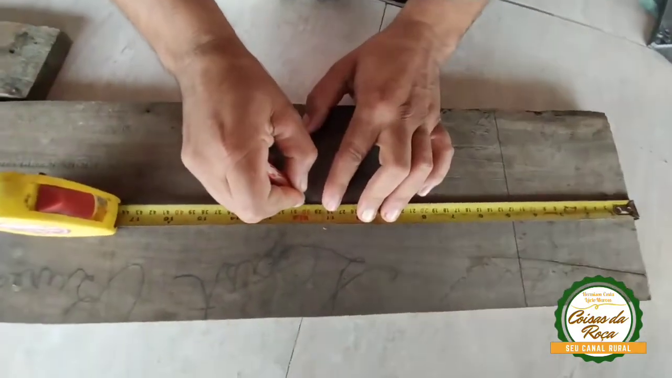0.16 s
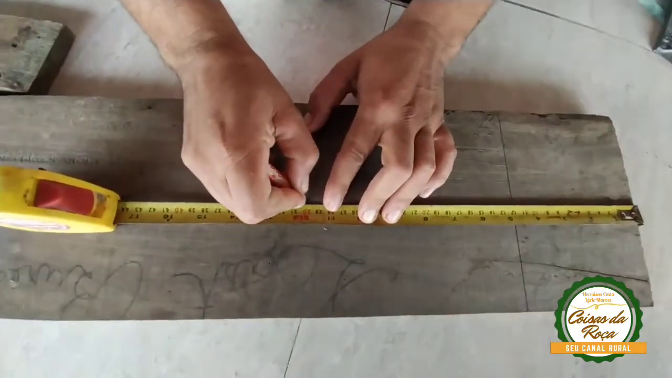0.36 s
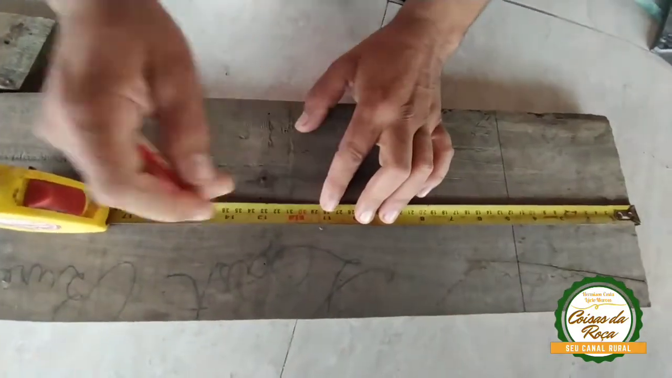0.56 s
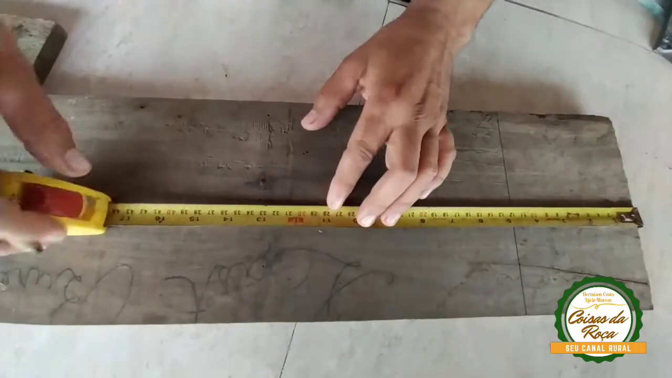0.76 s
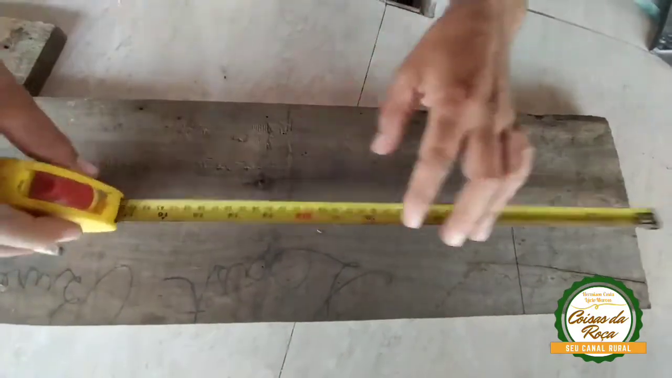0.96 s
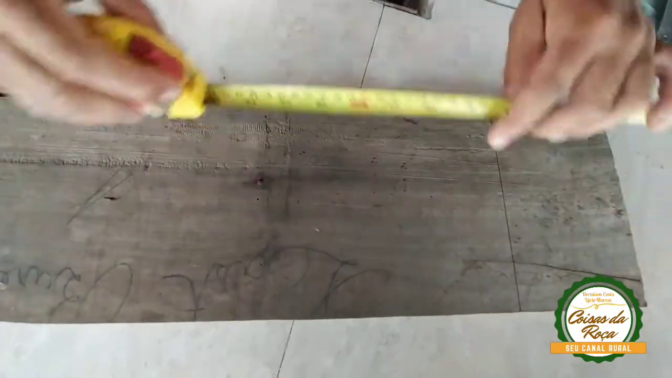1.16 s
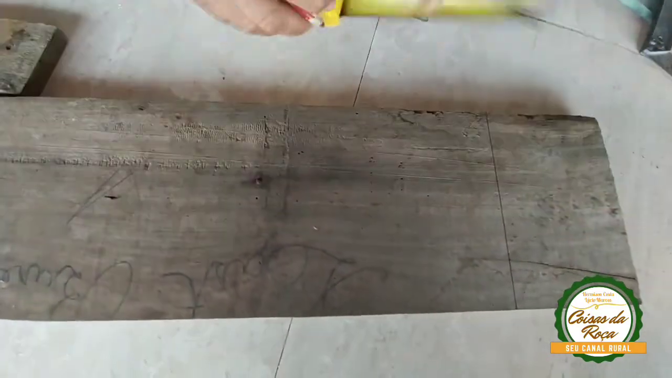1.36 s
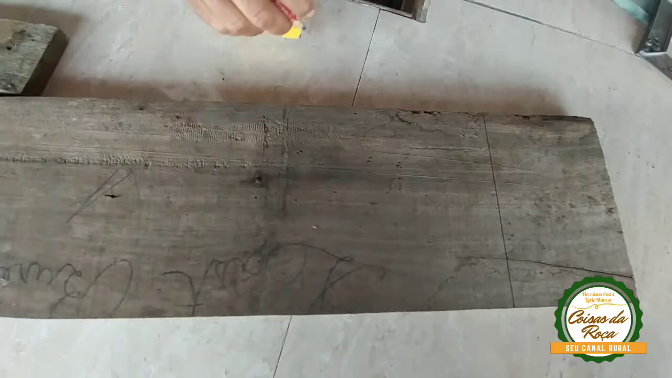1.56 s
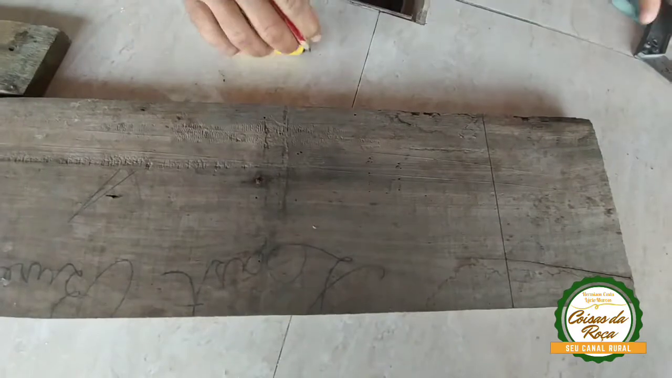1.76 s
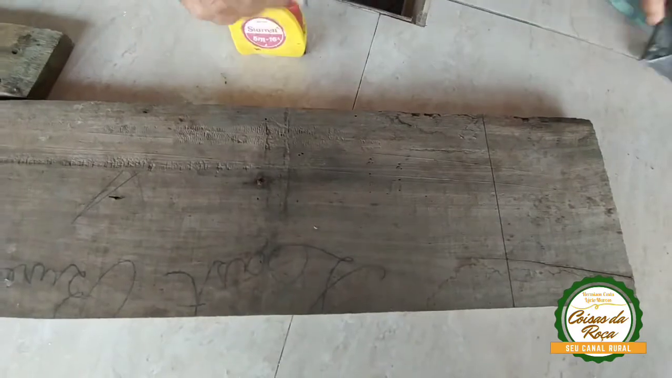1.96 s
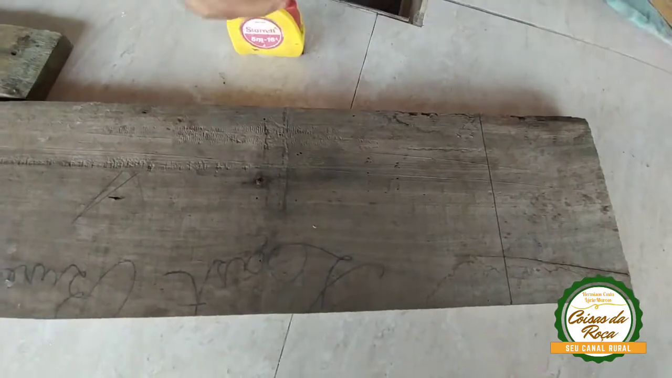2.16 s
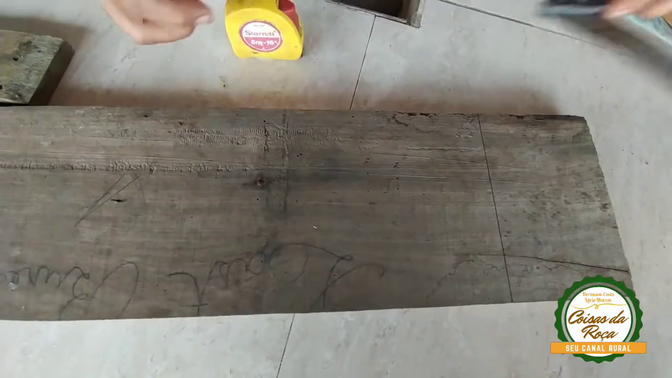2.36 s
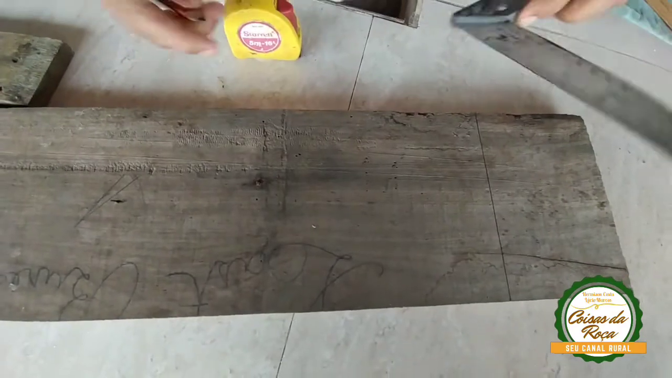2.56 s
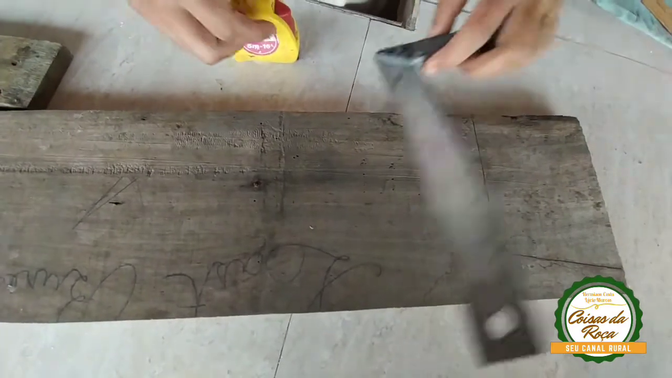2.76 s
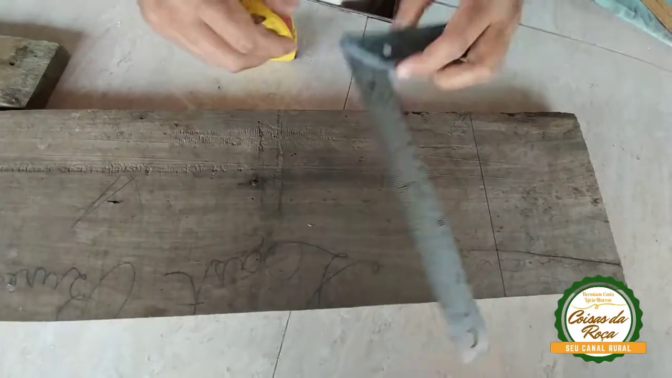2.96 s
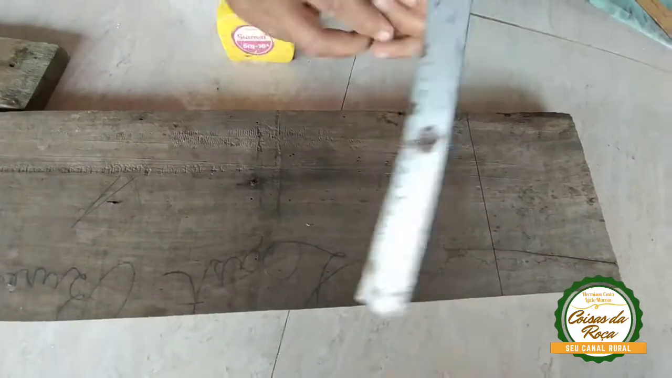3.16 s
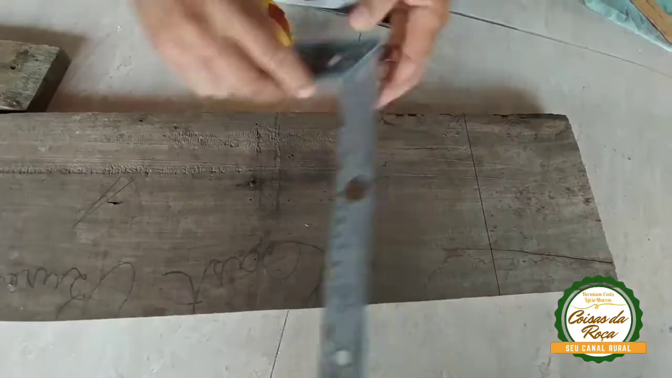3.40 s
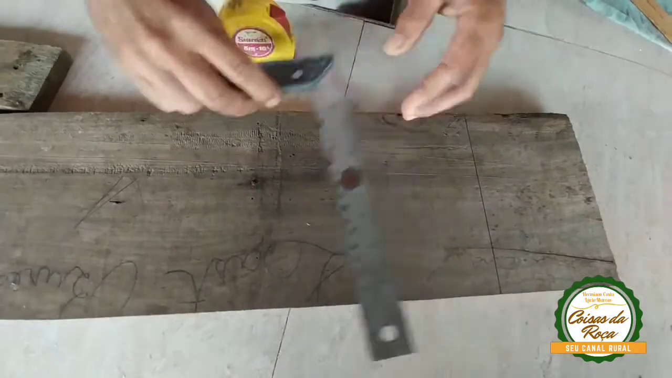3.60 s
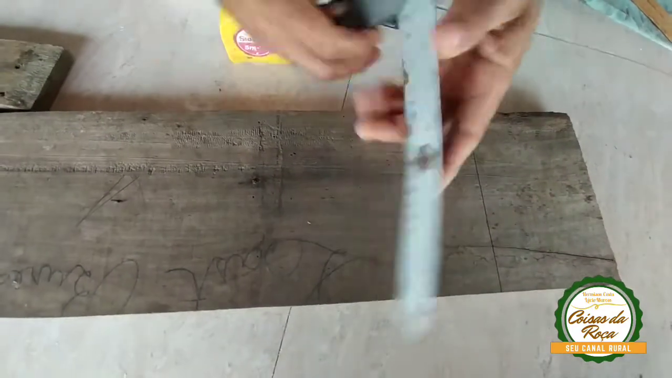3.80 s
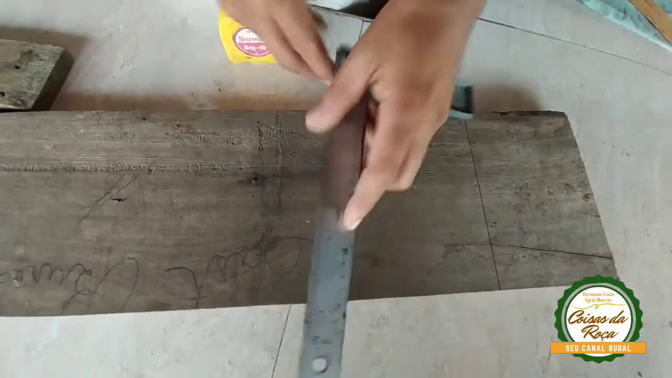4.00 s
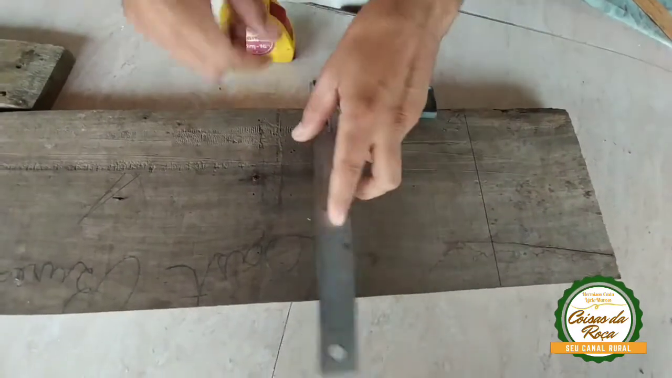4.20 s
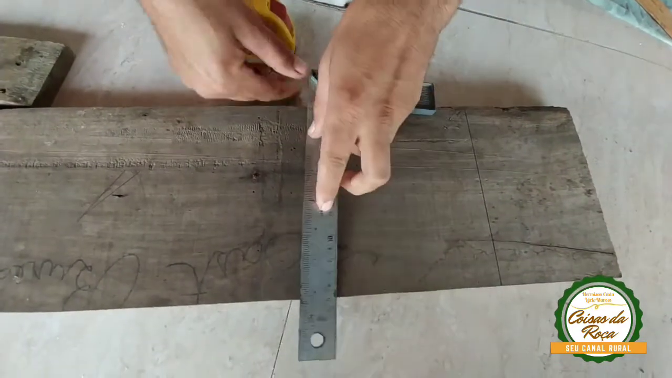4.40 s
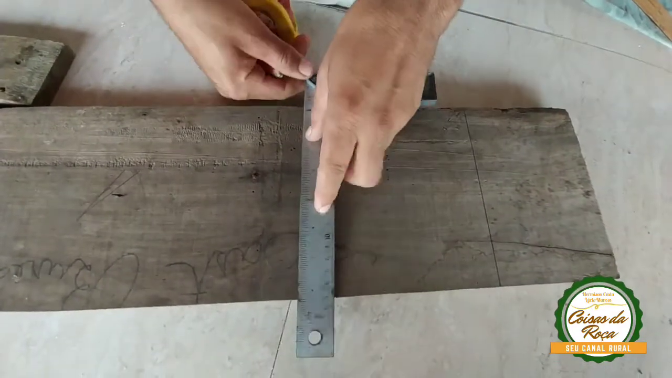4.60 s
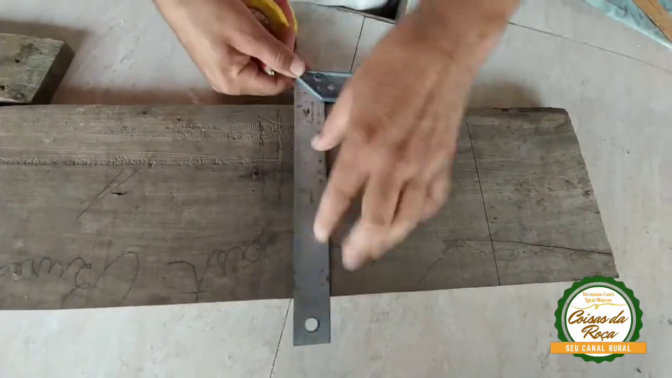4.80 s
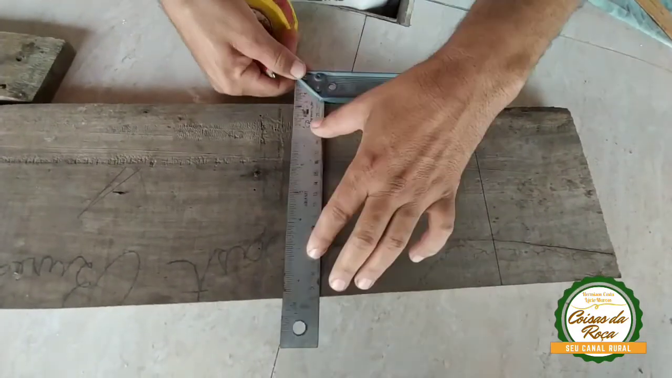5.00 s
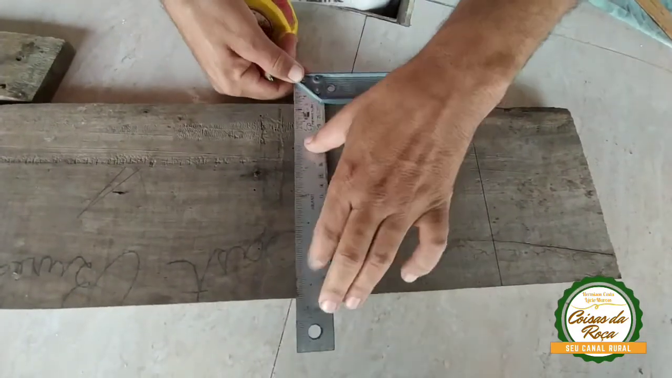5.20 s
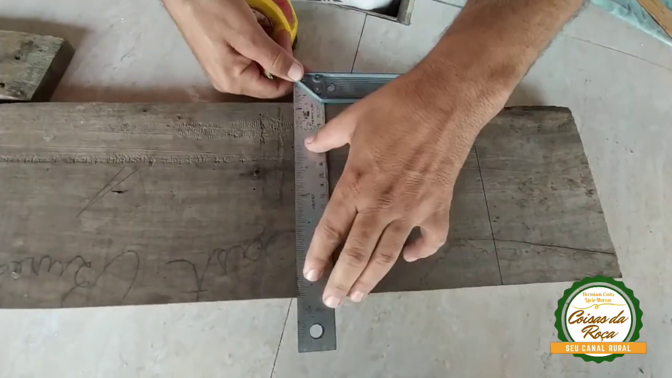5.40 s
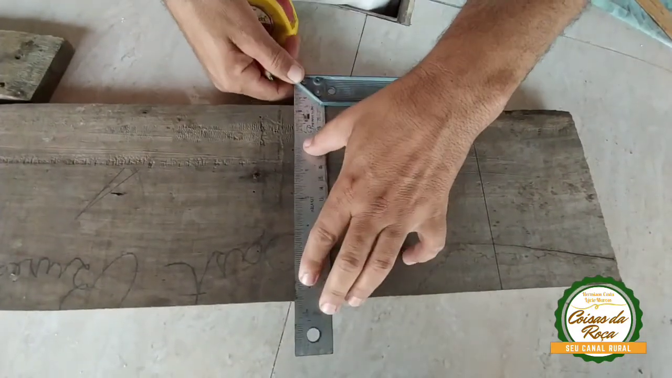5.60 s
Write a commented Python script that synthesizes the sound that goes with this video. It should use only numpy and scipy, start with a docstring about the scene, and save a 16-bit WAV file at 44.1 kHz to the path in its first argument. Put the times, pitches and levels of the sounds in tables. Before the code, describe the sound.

A quiet porch with faint steady outdoor hiss, dull low bumps and soft distant bird notes. At about 0.9 s a plastic click unlocks a tape measure; from 1.1 s bright, ringing steel ticks come thick and fast. From 1.24 to 1.62 s the blade rasps and chatters into the case, a low whir wandering upward, ending in a hard snap and clack. Two clicks follow at 1.75 s, then the case clacks on tile at 1.81 s, with small knocks and a brief gritty drag around 2.0-2.15 s. Mostly quiet until 3.5 s, with birds and soft thumps. A steel square taps wood at 3.9 s, clicks near 4.05 s, knocks loudly at 4.27 s, taps lightly, then knocks loudly again at 4.84 s with short scrapes, a tiny high squeak and faint steel ring. A sharp slap at 5.02 s and small slides fade by 5.3 s. Close, dry, with slight echo.

```python
"""Tape measure and try square on a tiled porch

A steel tape is unlocked; its blade chatters, whirs into the plastic case and snaps home: noise ticks and ringing modes.
The case lands on the floor as short modes and noise; a steel square knocks, slides and squeaks on a wooden board.
Soft low bumps sag in pitch; outdoors are steady filtered noise and far-off birds built from harmonics.
A phone just above hears it all, with a scattered echo from the porch."""
import sys
import numpy as np
from scipy import signal
from scipy.fft import rfft, irfft, next_fast_len
from scipy.io import wavfile
from scipy.ndimage import uniform_filter1d

SR = 44100
rng = np.random.default_rng(int(sys.argv[2]) if len(sys.argv) > 2 else 0)


def unload_wav(signal):
    """Save mono or channel-first audio to the path in sys.argv[1] as 16-bit WAV at rate SR, clipped to [-1, 1]."""
    wavfile.write(
        sys.argv[1],
        SR,
        np.round(np.clip(np.atleast_2d(signal).T, -1, 1) * 32767).astype(np.int16),
    )


N = 249165
TIME = np.arange(N) / SR  # seconds through the whole scene
AGE = TIME[:SR // 2]  # seconds since a single contact began
LEFT_RIGHT = np.array([[1], [-1]])  # opposite signs for the two sides
TOP_HZ = 16000

# A "t60" is the time in which a sound falls by 60 dB.
# steady outdoor hiss, its colour: hz, level_db
AIR_COLOUR = [(100, -5.5), (180, -2), (300, -6.5), (550, -9.5), (1150, -9), (1400, -13), (2200, -4),
              (3400, -9), (5200, -14.5), (9500, -14), (11500, -17.5), (12500, -30), (15000, -31)]
AIR_DB = -54
# far-off bird notes: start_s, length_s, level_db, top_pitch_hz, brightness_db (tilt per harmonic)
BIRD_NOTES = [(0.238, 0.19, -60, 1171, 0.5), (0.531, 0.2, -58.5, 1165, 1), (2.21, 0.19, -52, 1183, -1),
              (2.441, 0.13, -54.5, 1125, 0.5), (2.529, 0.18, -54, 1189, 0), (2.821, 0.17, -55, 1188, 0.3),
              (3.11, 0.192, -55.5, 1175, -0.5), (3.38, 0.24, -53.5, 1174, 0.2),
              (3.719, 0.16, -51.5, 1151, 1), (4.531, 0.18, -44.5, 1184, 1), (5.43, 0.17, -52, 1155, 5.5)]
# harmonics of a bird note, from the first up, before the tilt: level_db
BIRD_HARMONICS = [-13, 0, -14, -15, -20]
NOTE_ARCH, NOTE_WAVER_HZ = 0.0608, 7.05  # share the pitch droops at the ends, and its unsteadiness

# soft low bumps: start_s, level_db, pitch_hz (the centre of the sag)
BUMPS = [(0.08, -32, 174), (1.041, -35, 166), (1.563, -30.5, 181), (1.584, -29, 140), (2.586, -37.5, 163),
         (3.035, -38.5, 171), (3.171, -28.5, 168), (3.426, -31.5, 173), (3.463, -27, 170),
         (3.632, -35.5, 156), (3.758, -36, 183), (3.794, -28, 167.6), (4.666, -23.5, 164),
         (5.105, -31.5, 163), (5.248, -33, 190)]
# low rumble before its overall trim: time_s, level_db
RUMBLE = [(0, -54), (0.85, -58.5), (1.08, -47.5), (1.46, -56.5), (1.58, -42), (1.7, -57), (2.8, -60.5),
          (3.45, -51.5), (4.25, -49.5), (5.3, -50.5), (5.65, -40)]
SWELL_DB, SWELL_S = -23.5, 0.068  # rumble swell around each bump: level against it, and half-width

# clicks of blade, lock and hook on the case: start_s, level_db,
# weight (0 a graze of steel, 1 a full blow on the case), left_minus_right_db
TAPE_CLICKS = [(0.876, -11.5, 0.94, -6.5), (0.885, -32, 0.9, 4), (0.967, -31.5, 0.98, -2),
               (1.041, -25.5, 0.88, -11), (1.064, -23, 0.6, 0), (1.1109, -6, 0.26, -5),
               (1.118, -1, 0.05, -11.5), (1.135, -17, 0.7, -1), (1.156, -12, 0, -1),
               (1.172, -7.5, 0.2, -12.5), (1.218, -0.5, 0, -5.5), (1.2209, -16, 0.82, -14),
               (1.228, 0.5, 0, -2), (1.249, -11, 0.2, -6), (1.2614, -11, 0.2, -7), (1.283, -15, 0.1, -7),
               (1.295, -11.5, 0.1, -12), (1.312, -7, 0, -4), (1.338, -8, 0, -9), (1.37, -7, 0, -8),
               (1.408, -7, 0, -13), (1.4369, -7.5, 0.3, -1), (1.562, -20, 0.1, -12),
               (1.573, -13.5, .2, -17), (1.592, -9.5, 0.1, -13), (1.602, -12, 0.5, -15),
               (1.6155, 1.5, 0.51, -1.5), (1.749, -8, 0.63, -9.5), (1.7548, -6.5, 0.63, 4.5),
               (1.768, -16.5, 0.94, -7), (3.537, -33, 0.95, -3), (4.05, -18, 0.62, -7),
               (4.063, -13.5, 0.58, -1), (4.083, -8, 0.54, -3)]
# colour of the bright steel tick: hz, level_db
TICK_COLOUR = [(2500, -71), (4500, -5.5), (7000, -4.5), (9200, 15), (11000, 4.5), (12500, -32),
               (16000, -31)]
# colour of the plastic shell: hz, level_db
SHELL_COLOUR = [(900, 0.5), (1250, 0.5), (1800, 7), (2400, 11.5), (2800, 9.5), (3400, 11), (4300, 8.5),
                (5000, 2), (5900, 10.5), (7000, 6)]
# colour of the hollow inside of the case: hz, level_db
HOLLOW_COLOUR = [(200, -14.5), (400, -7.5), (500, -3), (600, -2.5), (720, -6), (900, -1), (1200, 2),
                 (1600, -12), (3000, -17.5)]
# high ring of the coiled blade: hz, level_db, t60_s
COIL_MODES = [(2640, -29, 0.028), (3170, 13, 0.046), (4860, 10, .04), (6880, 19, .05), (7760, 19, 0.049),
              (8450, 17, .07), (8720, 22.5, 0.12), (9000, 25, 0.072), (9220, 5, 0.11), (9800, 29, 0.12),
              (10400, 16, 0.097), (9700, 23, 0.083), (10900, 19, 0.076)]
COIL_DETUNE = .02  # typical share by which the coil's modes differ from contact to contact
CLICK_T60_S, CASE_T60_S = 0.014, 0.042  # the steel tick, and the plastic after it
SHELL_DB, SHELL_WEIGHT_DB = -30.5, 21.5  # level in a graze, and what a full blow adds
HOLLOW_DB, HOLLOW_WEIGHT_DB = -44.5, 36.5  # the same, but following the weight squared

# rubbing of blade and case under the fingers: start_s, length_s, level_db
SCUFFS = [(0.948, 0.24, -52), (1.027, 0.079, -41), (1.153, 0.04, -28.5), (4.093, 0.042, -32)]

# the blade running in, levels before their trims: time_s, scrape_db, reel_db, resonance_hz
BLADE_RUN = [(1.24, -32.5, -63, 481.3), (1.258, -31.5, -63, 476.7), (1.382, -26, -59.5, 533.5),
             (1.43, -29.5, -52.5, 570.5), (1.466, -29, -44.5, 626), (1.508, -28.5, -61, 556),
             (1.55, -32, -56, 570), (1.6, -31.5, -48, 649)]
# colour of the scraping blade: hz, level_db
BLADE_COLOUR = [(880, -42), (1500, -20), (1590, -22), (2800, -11), (3250, -11), (3730, -18.5),
                (4690, -10.5), (5120, -11), (7540, -6), (9100, 0), (10900, -1), (12000, -11.5),
                (14600, -15), (16000, -29)]
RUN_PAN_DB, REEL_WIDTH_HZ = -1.5, 180

# whole-case clack as the hook stops the reel: hz, level_db, t60_s
STOP_MODES = [(500, 2, .018), (790, 4, .018), (1500, -5, .025), (3370, -6, .033), (5000, -1, .02)]
STOP_S, STOP_DB = 1.6205, -19.5
# colour of the dry crack of that stop: hz, level_db
STOP_CRACK_COLOUR = [(250, -9), (900, 4.5), (1500, 0), (1900, -9), (4300, 2), (5100, 10), (5900, 1),
                     (7500, 10), (10000, -14)]
STOP_CRACK_S, STOP_CRACK_DB, STOP_CRACK_T60_S = 1.6165, -11, 0.026

# case meeting the tiles, levels before their trims:
# start_s, body_db, contact_db, contact_t60_s, left_minus_right_db
SET_DOWN = [(1.8096, -17.5, -8.5, 0.02, -3.5), (1.812, -8, -8, 0.0079, 2.5), (1.827, -35, -45, 0.034, 1),
            (1.948, -44, -42, 0.079, -3), (2.027, -33.5, -26.5, 0.024, -2), (2.032, -33, -34.5, 0.05, 9),
            (2.038, -33, -34.5, 0.074, 1), (2.046, -43, -32.5, 0.12, -3)]
# ringing body of the case: hz, level_db, t60_s
CASE_MODES = [(234, -13, 0.025), (276, -22, 0.05), (445, -32, 0.097), (845, -19, 0.055), (906, -15, 0.14),
              (1057, -3.5, 0.03), (1118, 5.5, 0.021), (1240, 6, 0.017), (1890, -1.5, 0.021),
              (2490, -25, 0.046), (3160, -12, 0.027)]
# colour of case touching tile: hz, level_db
CONTACT_COLOUR = [(200, -16), (500, -7), (800, -3), (1200, -7), (2000, 5), (2500, -5), (2900, -8),
                  (3500, -10), (5000, -16), (7500, -11), (10500, -9.5), (12000, -18), (16000, -37)]
CASE_THUD_DB, CASE_THUD_T60_S = -24.5, 0.28  # dull thud on the floor, against the body
CASE_LAG_S = 0.0002  # the case reaches the left side this much later
RATTLE_S, RATTLE_DB, RATTLE_T60_S = 1.815, -41, .25  # the reel shakes loose inside after landing
# the case dragged a little over the tiles: start_s, length_s, level_db
DRAG = [(2.079, 0.077, -32)]
# colour of that drag: hz, level_db
TILE_COLOUR = [(2200, -6), (3500, -10), (4200, 0.5), (5000, -10), (5600, -4.5), (7000, -14), (9400, 0.5),
               (11000, 4.5), (13000, -7), (15500, -31)]

# square meeting the board: start_s, stock_db, blade_db, steel_ring_db, left_minus_right_db
SQUARE_HITS = [(3.904, -14.5, -25, -42, -4), (3.909, -26, -26, -39.5, -10), (4.2681, 1, -19, -35, 5),
               (4.396, -16.5, -21, -44, -6), (4.424, -27, -34.5, -64, -2), (4.449, -28.5, -34.5, -57, -6),
               (4.609, -28.5, -38.5, -67, -7), (4.631, -23.5, -32.5, -69, -4),
               (4.8444, 0.5, -19.5, -34, 1.5), (4.86, -32, -37, -31.5, -20), (4.958, -27, -26, -58, -1),
               (5.024, -24, -8.5, -38, -2), (5.030, -19.5, -21.5, -60, -12), (5.072, -23, -33, -60, -3)]
# ring of a knock by the stock: hz, level_db, t60_s
KNOCK_MODES = [(256, -32, 0.073), (320, -37, 0.044), (525, -39, 0.082), (649, -32, 0.097),
               (742, -31.5, 0.1), (808, -25.5, 0.092), (1003, -38, 0.12), (1470, -3.5, 0.0054),
               (1798, 0, 0.011), (1917, 0.5, 0.016), (2095, -5, 0.011), (2300, -26, 0.033),
               (3370, -30, 0.024), (3746, -19, 0.038)]
# ring of a slap by the blade: hz, level_db, t60_s
SLAP_MODES = [(228, -21.5, 0.084), (1050, -25, 0.062), (1059, -8, 0.045), (1160, -11, 0.011),
              (1190, -12, 0.022)]
# long ring of the steel: hz, tilted_db, flat_db, t60_s
STEEL_MODES = [(2080, -20, -3, .16), (2213, -18, -4, .17), (2385, -14, -4, .2), (3068, -6, -10, .12),
               (3752, -2, -11, .12), (4032, -14, 0, .13), (4985, -3, -13, .13), (5351, -12, -7, .1),
               (5600, -4, -12, .1), (6191, -25, -11, .14), (7250, -3, -15, .08), (7483, -22, -8, .1),
               (7967, -14, -9, .09), (8764, -18, -10, .14), (9889, -16, -6, .13), (10630, -14, -7, .08),
               (11200, -3, -9, .08), (11810, -25, -11, .11)]
FLAT_S = 4.7  # after this the square lies flat on the board
# colour of the contact crack: hz, level_db
CRACK_COLOUR = [(300, -10), (500, -19), (800, -7), (1500, 3), (2300, 0.5), (4000, -3.5), (6000, -10),
                (9000, -11.5), (11200, -6.5), (12500, -32), (16000, -55)]
CRACK_DB = -4.5  # against the blade's blow
CRACK_T60_S, CRACK_HALVING_DB = 0.024, 19  # crack of a 0 dB blow; half as long for each step harder
# colour of the board's loose thud under the stock: hz, level_db
BOARD_COLOUR = [(70, 1), (120, -2), (200, 1.5), (280, -2), (400, -11.5)]
BOARD_DB, BOARD_T60_S = -31, .2

# steel sliding on wood: start_s, length_s, flat_grating_db, edge_rasp_db
SLIDES = [(3.912, 0.031, -42.5, -38), (4.8, 0.027, -52.5, -43), (4.846, 0.04, -33, -26),
          (4.878, 0.055, -38.5, -43), (4.94, 0.062, -34, -66), (5.041, 0.09, -52, -53),
          (5.053, 0.042, -44, -62), (5.189, 0.071, -49.5, -47), (5.221, 0.037, -43.5, -59)]
# colour of the flat's grating: hz, level_db
GRATE_COLOUR = [(300, -1), (500, -19), (1000, 5), (1400, -3), (2200, -0.5), (4000, -5.5), (6000, -15),
                (9000, -14), (11200, -25), (12500, -40)]
# colour of the edge's rasp: hz, level_db
EDGE_COLOUR = [(2000, 2), (3000, -2), (4700, 0), (6100, -4.5), (7400, -2.5), (8300, -1.5), (9900, 2),
               (10700, 9.5), (11400, 0), (12300, -6), (13200, -27)]
# the steel edge catching on the grain: start_s, level_db
CATCHES = [(4.870, -17), (5.099, -37)]
# squeaks as the edge sticks and slips: start_s, length_s, level_db
SQUEAKS = [(4.803, 0.021, -49), (4.875, 0.025, -31)]
SQUEAK_HZ = 4160

# echo of the porch: hz, echo_db, t60_s
PORCH_BANDS = [(150, -4.5, 0.85), (493, -6.5, 0.66), (1050, -10.5, 0.23), (1930, -20, 0.65),
               (2770, -7, 0.27), (4950, -9.5, 0.36), (9800, -11.5, 0.44), (15000, -11, 0.24)]


def amp(db):
    """Turn decibels into gain."""
    return 10 ** (np.asarray(db) / 20)


def curves(table):
    """Draw each column of a timed table, sample by sample."""
    s, *columns = np.transpose(table)
    return [np.interp(TIME, s, column) for column in columns]


def place(x, pan_db):
    """Lean a sound left (positive) or right (negative) by a level difference."""
    return x * amp(LEFT_RIGHT * pan_db / 2)


def colour(x, spectrum):
    """Filter by (hz, db) points, falling away beyond their ends; white noise keeps its power."""
    hz, db = np.transpose(spectrum)
    f = np.maximum(np.fft.rfftfreq(x.shape[-1], 1 / SR), 1)
    ends = np.minimum(1, np.minimum(f / hz[0], hz[-1] / f)) ** 2
    gain = amp(np.interp(np.log(f), np.log(hz), db)) * ends
    return irfft(rfft(x) * gain / np.sqrt(np.mean(gain ** 2)), x.shape[-1])


def noise(spectrum, size, alike_hz=1500):
    """Coloured stereo noise: long waves reach both sides much alike, short ones do not."""
    padded = next_fast_len(size, real=True)
    mid, side = rfft(rng.standard_normal((2, padded)))
    likeness = .8 / (1 + (np.fft.rfftfreq(padded, 1 / SR) / alike_hz) ** 2)
    shared = mid * np.sqrt((1 + likeness) / 2)
    opposed = LEFT_RIGHT * side * np.sqrt((1 - likeness) / 2)
    return colour(irfft(shared + opposed, padded), spectrum)[:, :size]


def fade(t60, rise=.0006, age=AGE):
    """A quick rise and an exponential decay, both in seconds; t60 is at least 3 ms."""
    return (1 - np.exp(-age / rise)) * np.exp(-np.log(1000) * age / max(t60, .003))


def ring(modes, spread, scatter_db=0):
    """Decaying modes of chance strength; phase between the sides differs more for higher ones."""
    out = np.zeros((2, len(AGE)))
    chances = rng.standard_normal((len(modes), 2))
    for (hz, db, t60), (lag, luck) in zip(modes, chances):
        age = AGE[:int(SR * max(t60, .01) * 1.3)]
        # spread is the typical time shift in samples, opposite on the two sides
        phase = 2 * np.pi * hz * (age + LEFT_RIGHT * spread * lag / SR)
        level = amp(db + scatter_db * luck)
        out[:, :len(age)] += level * fade(t60, rise=0.001, age=age) * np.sin(phase)
    return out


def walk(rate):
    """Smooth random wander, scaled to a spread of 1; rate is steps per second."""
    k = int(SR / rate)
    held = np.repeat(rng.standard_normal(N // k + 1), k)[:N]
    steps = uniform_filter1d(held, k)
    return steps / steps.std()


def chatter(rate, scatter_db, t60):
    """Envelope of tiny contacts of uneven size, rate per second, scaled to rms 1."""
    contacts = rng.random(N) < rate / SR
    sizes_db = scatter_db * np.minimum(rng.exponential(size=N), np.pi)
    energy = contacts * amp(sizes_db) ** 2
    energy = np.abs(signal.fftconvolve(energy, fade(t60, rise=.0001) ** 2)[:N])
    return np.sqrt(energy / energy.mean())


def shifting(spectrum, depth_db, rate):
    """Noise whose narrow bands swell and sink on their own."""
    centres = np.geomspace(1500, 15000, num=64)
    f, t, cells = signal.stft(noise(spectrum, N), SR, nperseg=512)
    levels = rng.standard_normal((len(centres), len(t)))
    levels = uniform_filter1d(levels, int(1 / (rate * t[1])) + 1)
    shares = np.array([np.interp(f, centres, row) for row in np.eye(len(centres))])
    gain = amp(depth_db * shares.T @ levels / levels.std())
    return signal.istft(cells * gain, SR)[1][:, :N]


def varied(spectrum, scatter_db):
    """The same spectrum with chance peaks and dips, so each click differs a little in colour."""
    hz, db = np.transpose(spectrum)
    points = np.geomspace(hz[0], hz[-1], num=28)
    levels = np.interp(np.log(points), np.log(hz), db)
    return np.c_[points, levels + scatter_db * rng.standard_normal(len(points))]


def strokes(table):
    """Pressure of rubbing strokes, each swelling quickly and easing off."""
    total = 0
    for s, length, db in table:
        progress = np.clip((TIME - s) / length, 0, 1)
        total = total + amp(db) * np.sin(np.pi * np.sqrt(progress))
    return total


def resonate(x, response):
    """What a body sings when x drives it, at the level of x."""
    singing = signal.fftconvolve(x, response, axes=1)[:, :N]
    return singing * x.std() / singing.std()


def add(out, s, x):
    """Mix a sound in at time s."""
    i = max(int(s * SR), 0)
    out[:, i:i + x.shape[1]] += x[:, :max(N - i, 0)]


def outdoors(blur_db=-3, blur_hz=60):
    """Distant hiss, and far-off birds: arching harmonic notes blurred by slow noise in their level."""
    out = noise(AIR_COLOUR, N) * amp(AIR_DB + .5 * walk(2.28))
    for s, length, db, top_hz, bright_db in BIRD_NOTES:
        swell = np.sqrt(np.abs(np.sin(np.pi * np.minimum(AGE / length, 1))))
        pitch = top_hz * (1 - NOTE_ARCH * (1 - swell)) + NOTE_WAVER_HZ * walk(22.4)[:len(AGE)]
        phase = 2 * np.pi * np.cumsum(pitch) / SR
        note = 0
        for k, harmonic_db in enumerate(BIRD_HARMONICS, 1):
            # the tilt turns about the second harmonic
            note = note + amp(harmonic_db + (k - 2) * bright_db) * np.sin(k * phase)
        blur = 1 + amp(blur_db) * noise([(10, 0), (blur_hz, -3)], len(AGE))
        add(out, s, amp(db) * swell * note * blur)
    return out


def bumps(bump_db=0, rumble_db=-3, sag=0.54, sag_s=0.011, t60=0.087, blur_db=-9):
    """Dull thuds of a few cycles that sag in pitch, over an uneven rumble that differs at each side."""
    swells = 0
    for s, db, _ in BUMPS:
        swells = swells + amp(db + SWELL_DB) * np.exp(-((TIME - s) / SWELL_S) ** 2)
    rumble_colour = [(20, 4), (45, -4.5), (80, -0.5), (120, -14.5), (220, -17.5)]
    out = (amp(curves(RUMBLE)[0] + rumble_db) + swells) * noise(rumble_colour, N, alike_hz=62)
    for s, db, hz in BUMPS:
        # from 1.81 times the listed pitch down to 0.73 times
        pitch = hz * (1 + sag * (2 * np.exp(-AGE / sag_s) - 1 / 2))
        thud = np.sin(2 * np.pi * np.cumsum(pitch) / SR)
        thud = thud + amp(blur_db) * noise([(hz / 3, -6), (hz, 0), (2 * hz, -30)], len(AGE))
        envelope = fade(t60, rise=0.0055) * (1 - np.exp(-AGE / 0.0029))
        add(out, s, amp(db + bump_db) * thud * envelope)
    return place(out, pan_db=-10.5)


def coil_ring():
    """The coil's ring, its pitches scattered a little by chance at each contact."""
    modes = [(hz * (1 + COIL_DETUNE * rng.standard_normal()), db, t60) for hz, db, t60 in COIL_MODES]
    return ring(modes, spread=23, scatter_db=3)


def tape_clicks(tick_db=-9.0, coil_db=-39):
    """A bright steel tick rings the coil; a heavier one rattles the shell and stirs the hollow case."""
    out = np.zeros((2, N))
    case_fade = fade(CASE_T60_S)
    for s, db, weight, pan in TAPE_CLICKS:
        tick = varied(TICK_COLOUR, scatter_db=2.5)
        shell = varied(SHELL_COLOUR, scatter_db=3)
        shell_gain = amp(SHELL_DB + weight * SHELL_WEIGHT_DB)
        hollow_gain = amp(HOLLOW_DB + weight ** 2 * HOLLOW_WEIGHT_DB)
        hit = amp(tick_db) * noise(tick, len(AGE)) * fade(CLICK_T60_S)
        hit += amp(coil_db) * coil_ring() * case_fade
        hit += shell_gain * noise(shell, len(AGE)) * case_fade
        hit += hollow_gain * noise(HOLLOW_COLOUR, len(AGE)) * fade(CASE_T60_S, rise=0.007)
        add(out, s, place(amp(db) * hit, pan))
    return out


def scuffs():
    """Short gritty strokes of blade and case, made of dense tiny contacts."""
    grit = chatter(rate=1400, scatter_db=2, t60=.012)
    return place(noise(BLADE_COLOUR, N) * grit * strokes(SCUFFS), pan_db=-0.5)


def retraction(scrape_db=1, reel_db=-5, hum_db=-2, clatter_db=-8):
    """The spring drags the blade through the slot in broken chatter; the reel's hum wanders upward."""
    scrape, reel, reel_hz = curves(BLADE_RUN)
    running = np.interp(TIME, [1.225, 1.245, 1.612, 1.622], [0, 1, 1, 0])
    # the blade flaps as it runs, so the colour of the scrape keeps shifting
    hiss = shifting(BLADE_COLOUR, depth_db=6.5, rate=35)
    rubbing = chatter(rate=2600, scatter_db=2.2, t60=.005)
    # sparser ticks where the blade's edges hit the slot
    ticks = chatter(rate=80, scatter_db=1.2, t60=.012)
    clatter = amp(clatter_db) * shifting(TICK_COLOUR, depth_db=4.5, rate=60) * ticks
    blade = running * (hiss * rubbing + clatter) * amp(scrape + scrape_db)
    # slow noise on a sine makes a narrow band of noise around the resonance
    slow_noise = noise([(10, 0), (REEL_WIDTH_HZ / 2, -3)], N)
    hum = slow_noise * np.sqrt(2) * np.sin(2 * np.pi * np.cumsum(reel_hz) / SR)
    drum = noise(HOLLOW_COLOUR, N) * chatter(rate=690, scatter_db=-1.0, t60=0.052)
    rumble = amp(reel_db) * drum + amp(hum_db) * hum
    return place(blade + running * amp(reel) * rumble, RUN_PAN_DB)


def reel_stop():
    """The hook stops the reel: a dry crack of noise, then the modes of the whole case clack."""
    out = np.zeros((2, N))
    crack = noise(STOP_CRACK_COLOUR, len(AGE)) * fade(STOP_CRACK_T60_S)
    add(out, STOP_CRACK_S, amp(STOP_CRACK_DB) * crack)
    add(out, STOP_S, amp(STOP_DB) * ring(STOP_MODES, spread=4.4))
    return out


def case_on_floor(body_db=-3, contact_db=1):
    """The case lands edge first, rocks flat and rattles, then is knocked again and dragged a little."""
    out = np.zeros((2, N))
    thud_colour = [(100, -4.5), (200, 3.5), (400, -32.0)]
    for s, db, contact, t60, pan in SET_DOWN:
        body = ring(CASE_MODES, spread=2)
        body = body + amp(CASE_THUD_DB) * noise(thud_colour, len(AGE)) * fade(CASE_THUD_T60_S)
        touch = noise(CONTACT_COLOUR, len(AGE)) * fade(t60)
        hit = amp(db + body_db) * body + amp(contact + contact_db) * touch
        add(out, s, place(hit, pan))
    shaking = chatter(rate=130, scatter_db=2, t60=.015)[:len(AGE)]
    rattle = noise(CONTACT_COLOUR, len(AGE)) * shaking * fade(RATTLE_T60_S)
    add(out, RATTLE_S, amp(RATTLE_DB) * rattle)
    grit = shifting(TILE_COLOUR, depth_db=4, rate=12) * chatter(rate=1800, scatter_db=1.5, t60=.009)
    out += grit * strokes(DRAG)
    late_left = np.interp(TIME - CASE_LAG_S, TIME, out[0])
    return np.array([late_left, out[1]])


def steel_ring(flat):
    """The square's long ring, while it is held tilted or once it lies flat."""
    modes = [(hz, flat_db if flat else tilted_db, t60) for hz, tilted_db, flat_db, t60 in STEEL_MODES]
    return ring(modes, spread=14, scatter_db=1.5)


def square():
    """The stock knocks on the board's edge; the blade slaps its face with a crack and rings."""
    out = np.zeros((2, N))
    for s, stock_db, blade_db, steel_db, pan in SQUARE_HITS:
        knock = ring(KNOCK_MODES, spread=1.5, scatter_db=.5)
        board = noise(BOARD_COLOUR, len(AGE)) * fade(BOARD_T60_S, rise=0.0037)
        knock = knock + amp(BOARD_DB) * board
        slap = ring(SLAP_MODES, spread=2, scatter_db=1)
        steel = steel_ring(flat=s > FLAT_S)
        crack_t60 = CRACK_T60_S * 2 ** (-blade_db / CRACK_HALVING_DB)
        crack = amp(CRACK_DB) * noise(CRACK_COLOUR, len(AGE)) * fade(crack_t60)
        hit = amp(stock_db) * knock + amp(blade_db) * (slap + crack) + amp(steel_db) * steel
        add(out, s, place(hit, pan))
    return out


def sliding(steel_db=-8, catch_t60=0.053, catch_ring_db=-15, waver_hz=15):
    """The pushed square grates, rasps and catches, ringing its steel; squeaks are a wavering sine."""
    flat_strokes = strokes([(s, length, db) for s, length, db, _ in SLIDES])
    edge_strokes = strokes([(s, length, db) for s, length, _, db in SLIDES])
    flat = shifting(GRATE_COLOUR, depth_db=4, rate=15) * flat_strokes
    edge = shifting(EDGE_COLOUR, depth_db=4, rate=15) * edge_strokes
    out = (flat + edge) * chatter(rate=600, scatter_db=2.3, t60=.007)
    out = out + amp(steel_db) * resonate(out, steel_ring(flat=True))
    for s, db in CATCHES:
        scrape = noise(EDGE_COLOUR, len(AGE)) * fade(catch_t60)
        add(out, s, amp(db) * (scrape + amp(catch_ring_db) * steel_ring(flat=True)))
    pitch = SQUEAK_HZ + waver_hz * walk(153.4)
    squeak = strokes(SQUEAKS) * np.sin(2 * np.pi * np.cumsum(pitch) / SR)
    return place(out + squeak, pan_db=-2.5)


def porch(x):
    """Floor, wall and roof scatter the sound back, each band dying at its own rate."""
    hz, db, t60 = np.transpose(PORCH_BANDS)
    f = np.fft.rfftfreq(len(AGE), 1 / SR)
    scatter = rfft(noise([(20, 0), (SR / 2, 0)], len(AGE)))
    response = 0
    for share, band_db, band_t60 in zip(np.eye(len(hz)), db, t60):
        tail = fade(band_t60, rise=0.00026)
        band = irfft(scatter * np.interp(f, hz, share), len(AGE))
        response = response + amp(band_db) * band * tail / np.linalg.norm(tail)
    return signal.fftconvolve(x, response, axes=1)[:, :N]


def scene():
    """The tools and their echo over the bumps and the outdoor background."""
    tape = tape_clicks() + reel_stop() + retraction() + scuffs() + case_on_floor()
    tools = tape + square() + sliding()
    return tools + porch(tools) + bumps() + outdoors()


def record(dry):
    """The phone rounds off the very loudest peaks and cuts the top with a steep low-pass filter."""
    rounded = dry / (1 + (dry / .9) ** 4) ** (1 / 4)
    low_pass = signal.ellip(10, .2, 80, TOP_HZ, fs=SR, output="sos")
    return signal.sosfilt(low_pass, rounded)


dry = scene()
out = record(dry)
unload_wav(out)
```